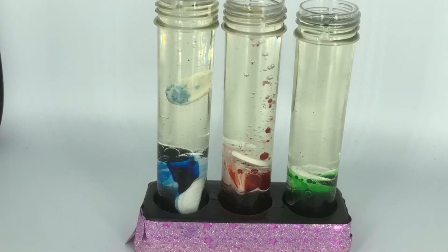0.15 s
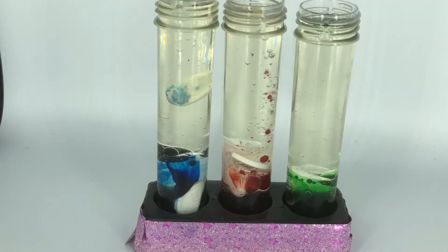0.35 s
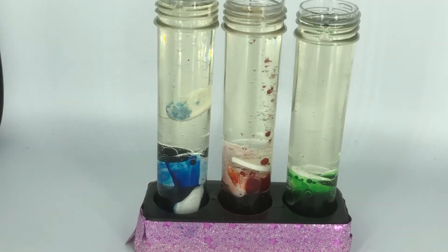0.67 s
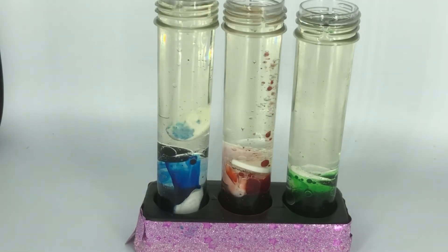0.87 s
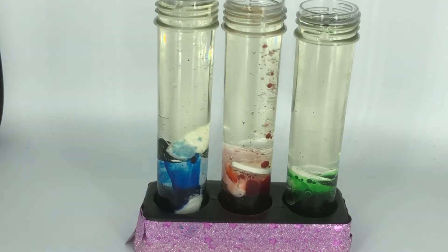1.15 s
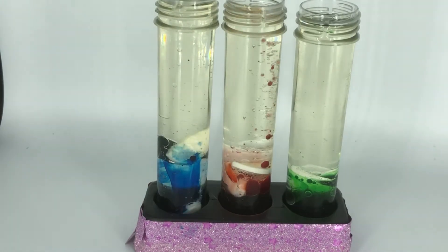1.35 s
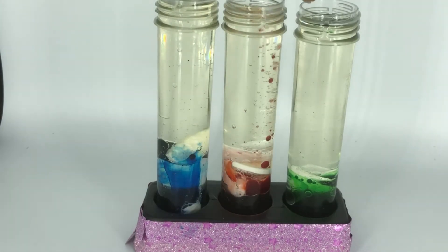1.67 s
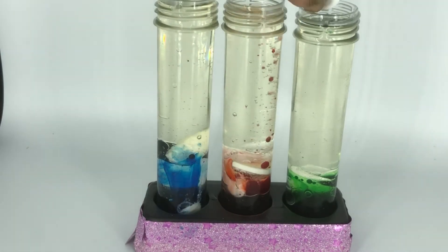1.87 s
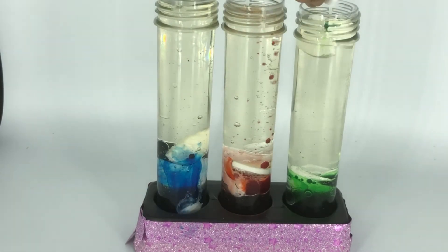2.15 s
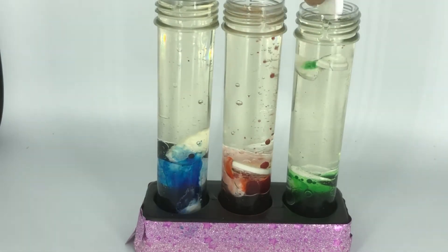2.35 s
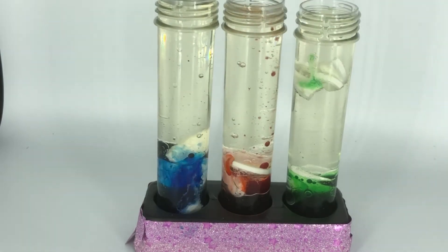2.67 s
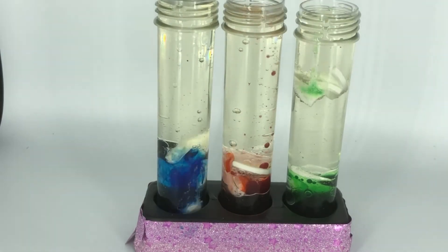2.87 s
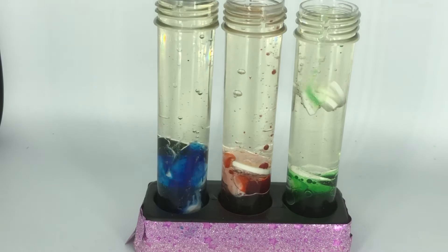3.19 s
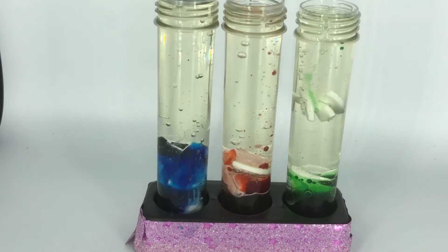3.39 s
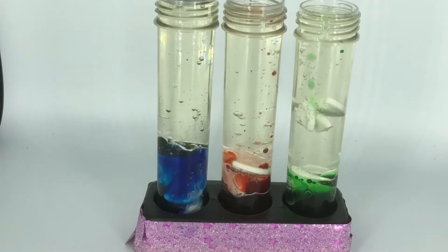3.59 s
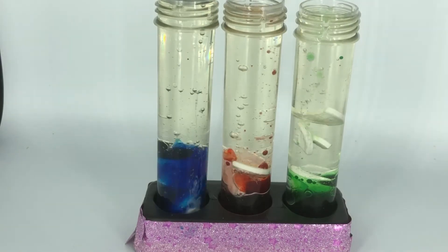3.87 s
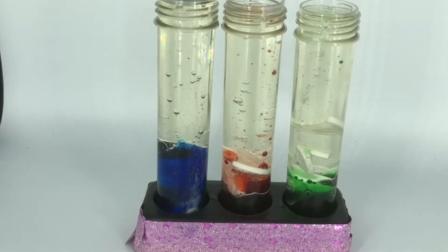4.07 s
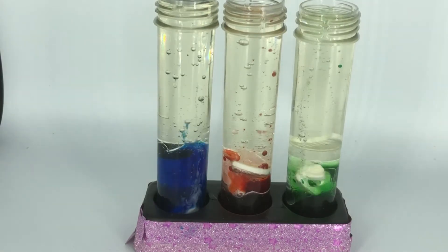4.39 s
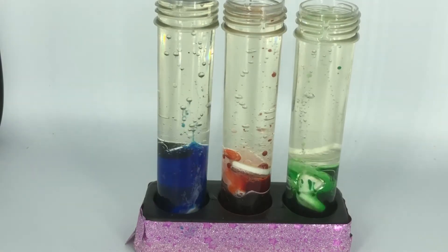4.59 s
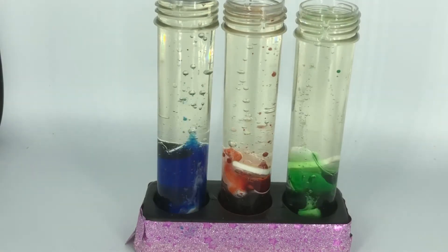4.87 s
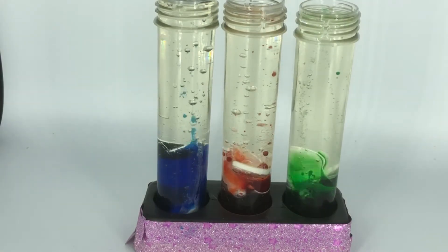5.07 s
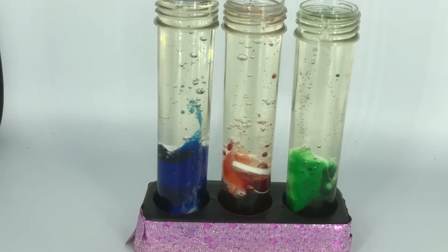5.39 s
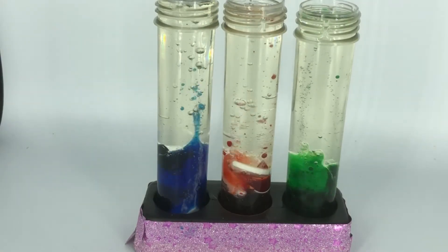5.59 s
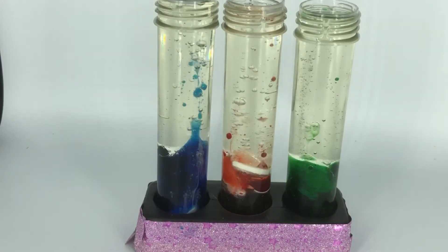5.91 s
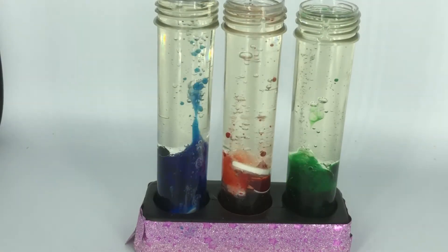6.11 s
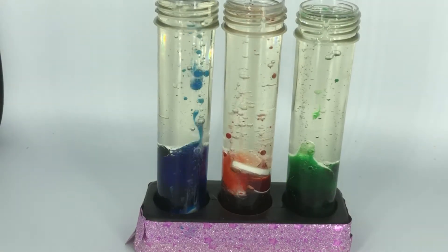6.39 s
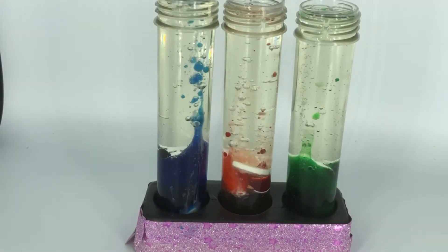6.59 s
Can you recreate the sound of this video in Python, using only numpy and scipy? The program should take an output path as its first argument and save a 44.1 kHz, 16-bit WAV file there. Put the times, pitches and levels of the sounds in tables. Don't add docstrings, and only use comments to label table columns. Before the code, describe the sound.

Quiet indoor hum with faint tablet fizz, sharp wrapper crackles, a few hard clicks on a tube, then thudding footsteps and scuffs further off.

```python
import sys
import numpy as np
from scipy import signal
from scipy.io import wavfile

SR = 44100
rng = np.random.default_rng(int(sys.argv[2]) if len(sys.argv) > 2 else 0)


def generate_wav(sig):
    pcm = np.round(np.clip(np.atleast_2d(sig).T, -1, 1) * 32767).astype(np.int16)
    wavfile.write(sys.argv[1], SR, pcm)


def linear_from_db(decibels):
    return 10 ** (np.asarray(decibels, float) / 20)


N = 297616
T = np.arange(N) / SR
EDGES_HZ = 25 * 2 ** np.arange(0, 9.5, 1 / 3)
MIDS_HZ = np.sqrt(EDGES_HZ[1:] * EDGES_HZ[:-1])

# f/Hz, level/dB, t60/s
BOARDS = [(144.8, -2.5, 0.19), (172, -8.5, 0.33), (204, 1, 0.11), (233, 0.5, 0.11), (267, -15, 0.19),
          (330, -6.5, 0.13), (395, -9.5, 0.1), (451.6, -0.5, 0.17), (483, 0, 0.51), (678, -7.5, 0.33),
          (696, -11, 0.41), (786, -29, 0.14), (971, -5.5, 0.14), (1112, -12, 0.56), (1194, -14, 0.28),
          (1400, -22, .14)]
# t/s, peak level/dB, hardness/dB, board note f/Hz
STEPS = [(3.2, -27.5, -19.5, 176), (3.24, -41, -14, 177), (3.646, -31, -12.5, 186),
         (3.943, -27.5, -24, 248), (3.988, -35, -16, 225), (4.061, -21, -15, 158), (4.135, -20, -15, 158),
         (4.165, -31, -12, 251), (4.197, -28.5, -18, 144), (4.26, -35, -22, 170), (4.63, -36.5, -15, 194),
         (4.66, -36.5, -9, 256), (4.72, -34, -16, 218), (4.789, -35, -22, 140), (5.391, -13.5, -1.5, 186),
         (5.427, -15, -12.5, 202), (5.598, -39, -6.5, 175), (5.858, -38, -23, 275),
         (6.078, -34.5, -18, 167), (6.127, -23, -22, 170), (6.175, -31.5, -31, 135), (6.252, -14, -5, 195),
         (6.285, -19.5, -9, 205), (6.319, -42, 11, 167), (6.474, -38, -16, 188), (6.519, -42, -7, 172),
         (6.648, -40.5, -4, 234)]


def rms_one(x):
    return x / np.sqrt(np.mean(x ** 2) + 1e-20)


def in_time(rows):
    s, *columns = np.transpose(rows)
    return [np.interp(T, s, c) for c in columns]


def level_of(spans):
    return sum((T > rows[0][0]) * (T < rows[-1][0]) * linear_from_db(in_time(rows)[0]) for rows in spans)


def band(x, low_hz, high_hz, order=2):
    edges = [low_hz, min(high_hz, 0.49 * SR)]
    return signal.sosfilt(signal.butter(order, edges, "band", fs=SR, output="sos"), x)


def drift(rate):
    r = np.exp(-80 * np.pi * rate / SR)
    noise = rng.standard_normal(N // 40 + 2002)
    slow = signal.lfilter([1], [1, -2 * r, r * r], noise)[2000:]
    return np.interp(np.arange(N) / 40, np.arange(len(slow)), rms_one(slow))


def ring(x, hz, t60):
    r = linear_from_db(-60 / (t60 * SR))
    w = 2 * np.pi * hz / SR
    return signal.lfilter([0, np.sin(w)], [1, -2 * r * np.cos(w), r * r], x + 1e-18)


def bands(excite, spectrum):
    hz, db = np.transpose(spectrum)
    gains = linear_from_db(np.interp(np.log(MIDS_HZ), np.log(hz), db, left=-np.inf))
    out = np.zeros((len(gains), N))
    for k, g in enumerate(gains):
        if g:
            out[k] = g * band(excite[k % 2], *EDGES_HZ[k:k + 2])
    return out / np.std(out.sum(0))


def grains(per_s, spread_db):
    sizes = linear_from_db(spread_db * np.minimum(rng.exponential(1, (2, N)), 5))
    sizes = sizes * rng.choice([-1, 1], (2, N))
    return sizes * (rng.random((2, N)) < per_s / SR)


def burst(rise, t60, size):
    t = np.arange(size) / SR
    shape = (1 - np.exp(-t / max(rise, 1e-4))) * linear_from_db(-60 * t / t60)
    return shape / shape.max()


def add(out, s, sound):
    at = round(s * SR)
    out[at:at + len(sound)] += sound[:N - at]


def after_steps(db, rise, t60):
    out = np.zeros(N)
    for s, peak_db, *_ in STEPS:
        add(out, s, (linear_from_db(peak_db + db) * burst(rise, t60, size=SR)) ** 2)
    return out


def room_tone():
    # f/Hz, level/dB per Hz
    hiss_colour = [(15, -58), (25, -57), (68, 0.5), (114, -14), (170, -1.5), (301, -7), (363, -13),
                   (439, -9.5), (641, -12), (962, -15.5), (2280, -23), (7710, -28), (8830, -26),
                   (16000, -37)]
    # f/Hz, width/Hz, level/dB
    port = (8700, 350, -17)
    # t/s, boom level/dB
    stir = [(0.0, -53), (0.25, -58.5), (0.9, -56.5), (1.2, -52), (1.9, -53), (2.15, -57), (2.5, -53),
            (3.0, -55), (3.5, -58.5), (3.9, -53.5), (4.45, -49), (4.62, -48), (4.8, -50), (4.9, -57),
            (5.3, -58.5), (5.8, -57.5), (6.5, -55), (6.75, -50.5)]
    # t/s, level/dB, rise/s, t60/s
    sway = (5.5, -53.5, -1.6, 4)

    hiss = bands(rng.standard_normal((2, N)), hiss_colour)
    hiss = sum(b * linear_from_db(1.8 * drift(12)) for b in hiss)
    hz, width, db = port
    hiss += linear_from_db(db) * rms_one(band(rng.standard_normal(N), hz - width / 2, hz + width / 2))

    stir_db, = in_time(stir)
    shake = rng.standard_normal(N) * linear_from_db(3.1 * drift(26))
    boom = sum(linear_from_db(g) * rms_one(ring(shake, hz, life * 0.15)) for hz, g, life in BOARDS if hz < 400)
    boom_power = linear_from_db(2 * stir_db) + after_steps(-20.5, rise=0.015, t60=0.45)
    boom = rms_one(band(boom, 116.4, 436, order=4)) * np.sqrt(boom_power)

    sub_db = -59.5 + 0.3 * (stir_db - stir_db.mean()) + 5 * drift(5.0)
    sub_power = after_steps(-34, rise=0.05, t60=0.34) + linear_from_db(2 * sub_db)
    rumble = rng.standard_normal(N)
    sub = rms_one(band(rumble, 43.5, 103)) * np.sqrt(sub_power) * linear_from_db(-5.5)
    s, db, rise, t60 = sway
    add(sub, s, rms_one(band(rumble, 24, 70)[SR:2 * SR]) * linear_from_db(db) * burst(rise, t60, size=SR))
    return linear_from_db(-56) * hiss + boom + sub


def fizz():
    # t/s, level/dB
    spans = [
        [(0.0, -63.5), (0.616, -70.5), (0.92, -62)],
        [(1.95, -64), (2.15, -62.5), (2.46, -70), (2.66, -58), (3.31, -60.5), (3.61, -59), (3.75, -56.5),
         (4.19, -60.5), (4.37, -58), (5.09, -55), (5.93, -56), (6.23, -50.5), (6.75, -52.5)],
    ]
    # f/Hz, width/Hz, level/dB
    mouth_modes = [(6200, 400, -16), (10600, 570, -16.5), (13200, 600, -16)]
    # t/s, peak level/dB, f/Hz
    pops = [(0.364, -42.5, 11000), (1.495, -36, 13500), (2.5965, -38, 9000), (3.1915, -45, 10400),
            (3.3113, -46, 8600), (3.76, -42, 11200), (3.887, -41, 7390), (4.4158, -52, 7300),
            (4.56, -35, 6110), (4.6762, -42, 9890), (5.2289, -46, 13100), (5.4006, -28, 7280),
            (5.5472, -55, 7180), (5.7099, -39, 12900), (5.8665, -38, 13100), (5.9982, -35.5, 8170),
            (6.0511, -41.5, 13100), (6.087, -51, 13200)]

    ticks = grains(5000, spread_db=3.0) * linear_from_db(0.7 * drift(20))
    mouths = sum(linear_from_db(db) * rms_one(band(ticks[1], hz - width / 2, hz + width / 2, order=1))
                 for hz, width, db in mouth_modes)
    surface = rms_one(band(ticks[0], 3500, 25700, order=1))
    out = linear_from_db(-1.5) * level_of(spans) * (surface + mouths)
    for s, db, hz in pops:
        spray = rng.standard_normal(900) * burst(0.0002, 0.09, size=900)
        add(out, s, linear_from_db(db - 6.5) * band(spray, hz * 0.87, hz * 1.07, order=1))
    return out


def creases():
    # t/s, peak level/dB, centre f/Hz, share under 4 kHz level/dB
    snaps = [(0.0984, -56, 11200, 7), (0.9468, -40.5, 12800, -6.5), (1.1004, -27.5, 11900, -38),
             (1.202, -30.5, 7100, -6), (1.2167, -31, 13500, -6), (1.2533, -32.5, 12100, -6),
             (1.285, -23, 10600, -17), (1.31, -31, 6450, -6), (1.3236, -30, 6680, -28),
             (1.394, -38, 13300, -17), (1.4066, -19, 6900, -20), (1.4207, -24, 13700, -14),
             (1.448, -34, 13600, -4.5), (1.5171, -28.5, 6390, -25), (1.525, -27.5, 7350, -7),
             (1.553, -32, 7390, -4.5), (1.5851, -37.5, 9930, 0.5), (1.611, -46.5, 5800, 6.5),
             (1.6277, -17.5, 9900, -15.5), (2.4537, -48.5, 10300, 5), (2.4742, -50, 10300, 2),
             (2.507, -31, 10200, -33), (2.5432, -25, 11800, -8.5), (2.6602, -34.5, 9000, -10),
             (2.7043, -33, 6090, -29), (2.766, -43, 5390, 1.5), (2.819, -46.5, 5000, 6.5),
             (2.848, -40, 7540, -4), (2.92, -33, 12500, -37), (3.031, -36, 12400, -27)]
    out, size = np.zeros(N), 6000
    lag = round(0.0033 * SR)
    for s, db, hz, low_db in snaps:
        t60 = 0.089 * linear_from_db(-0.23 * (db + 37))
        unevenness = np.repeat(rng.standard_normal(size // 40), 40)
        crackle = rng.standard_normal(size) * linear_from_db(2.7 * unevenness)
        shiver = crackle * burst(0.00052, t60, size) * linear_from_db(-7)
        shiver[0] += 1.5
        shiver[lag:] += linear_from_db(-13) * shiver[:-lag]
        bright = band(shiver, 4450, 15900) + 0.36 * band(shiver, hz * 0.85, hz * 1.18)
        bright *= linear_from_db(db) / np.abs(bright).max()
        dull = band(shiver, 630, 6300, order=1)
        add(out, s, bright + dull * linear_from_db(db + low_db + 4) / np.abs(dull).max())
    return out


def rub():
    # t/s, level/dB
    spans = [
        [(0.92, -62), (1.0, -51.5), (1.132, -45), (1.248, -48.5), (1.544, -53), (1.754, -50.5), (1.884, -50.5),
         (1.95, -60)],
        [(2.0, -65), (2.374, -63), (2.55, -56), (2.704, -57), (3.15, -62)],
    ]
    # f/Hz, level/dB per Hz
    foil_colour = [(180, -22), (300, -8), (478, 0), (603, -7), (689, -10), (930, 0), (1930, -9.5),
                   (4670, -7), (13500, -13), (16000, -16)]
    # f/Hz, width/Hz, level/dB
    pouch = [(888, 46, -10.5), (1280, 65, -26), (4620, 240, -22)]

    slips = grains(9000, spread_db=2.0)
    hollow = sum(linear_from_db(db) * rms_one(ring(slips[0], hz, 4.2 / width)) for hz, width, db in pouch)
    foil = bands(slips, foil_colour).sum(0)
    return level_of(spans) * linear_from_db(1.1 * drift(18) - 1) * (foil + hollow)


def taps():
    # t/s, peak level/dB, own note f/Hz, own note level/dB, tilt/dB per octave
    strikes = [
        (2.0846, -31, 6000, -1, 4.5),
        (2.3197, -19.5, 2850, -3, 7),
        (2.427, -37.5, 650, 4, -6),
        (3.982, -41.5, 2700, 10, 11.5),
        (4.773, -43, 600, 15, -11),
    ]
    # f/Hz, level/dB, t60/s
    tube = [(527, 8, 0.035), (674, 6, 0.026), (897, 1, 0.082), (1260, 3.5, 0.016), (1430, 6.5, 0.034),
            (1690, -5, 0.036), (2360, -29, 0.014), (2850, -3, 0.0088), (5360, -23, .012), (6270, -27, .012),
            (9200, -19, .01)]

    out, size = np.zeros(N), 12000
    lag = round(0.015 * SR)
    click = np.zeros(size)
    click[:5] = np.hanning(7)[1:-1]
    for s, db, note_hz, note_db, tilt_db in strikes:
        body = np.zeros(size)
        for k, (hz, g, t60) in enumerate(tube):
            body += (-1) ** k * linear_from_db(g + tilt_db * np.log2(hz / 1400)) * ring(click, hz, t60)
        chatter = rms_one(band(rng.standard_normal(size), note_hz * 0.66, note_hz * 1.03))
        chatter *= burst(0.00014, 0.035, size)
        body = body / np.abs(body).max() + linear_from_db(note_db - 13.5) * chatter
        body[lag:] += linear_from_db(-8.5) * band(body[:-lag], 390, 1230)
        wash = rms_one(band(rng.standard_normal(size), 360, 850, order=1)) * burst(0.0021, 0.15, size)
        add(out, s, linear_from_db(db) * (body + linear_from_db(-19.5) * wash))
    return out


def even(push, paths, hz, t60):
    return ring(push, hz, t60) / np.abs(ring(paths, hz, 0.086)).max()


def steps():
    out, size, roll_s = np.zeros(N), 14000, 0.13
    arrivals = grains(900, spread_db=2.0)[0, :size] * burst(0.0033, roll_s, size)
    arrivals[90] += 3
    for s, db, mid_db, note_hz in STEPS:
        t60 = 0.24 * linear_from_db(-0.19 * (mid_db + 9))
        top_db = -42 + 0.3 * (mid_db + 13)
        white = rng.standard_normal((4, size))
        push = arrivals + linear_from_db(-16.5) * white[0] * burst(0.0051, roll_s, size)
        low, mid = np.zeros(size), np.zeros(size)
        for hz, g, life in BOARDS:
            if hz < 400:
                off_note_db = 9 * abs(np.log2(hz / note_hz))
                low += linear_from_db(g - off_note_db) * even(push, arrivals, hz, life * t60 * 4)
            else:
                mid += linear_from_db(g) * even(push, arrivals, hz, life * t60 * 3)
        modes = low / np.abs(low).max() + linear_from_db(mid_db) * mid / np.abs(mid).max()
        wash = rms_one(band(white[1], 350, 656, order=1)) * burst(0.0064, t60 * 1.34, size) * linear_from_db(mid_db - 11)
        top = rms_one(band(white[2], 1300, 5400)) * burst(0.0046, t60 * 1.3, size)
        air = rms_one(band(white[3], 5000, 10000)) * burst(0.003, t60 * 0.98, size) * linear_from_db(-14)
        add(out, s, linear_from_db(db) * (modes + wash + (top + air) * linear_from_db(top_db - 24)))
    return signal.sosfilt(signal.butter(6, 118, "high", fs=SR, output="sos"), out)


def swish(strokes, fold_hz, fold_db, fold_per_tilt, width):
    # f/Hz, level/dB per Hz
    fibre_colour = [(240, -37), (400, -9.5), (598, -13.5), (964, -8.5), (1490, -13), (3530, -12),
                    (4380, -12), (11900, -23.5), (16000, -39)]
    fibres = bands(grains(14000, spread_db=3.5), fibre_colour)[10:]
    mids = MIDS_HZ[10:]
    octaves, out = np.log2(mids / 3500), np.zeros(N)
    fold = np.exp(-(np.log2(mids / fold_hz) / width) ** 2)
    t = np.arange(SR // 2) / SR
    for k, (s, attack, hold, db, tilt_db) in enumerate(strokes):
        late = np.maximum(t - attack - hold, 0)
        shape = linear_from_db(-13.5 * np.maximum(1 - t / attack, 0))
        shape *= np.minimum(50 * (t[-1] - t), 1)
        shape *= linear_from_db(-209 * late) + linear_from_db(-15.5 - 70 * late)
        colour = linear_from_db(db + (tilt_db + 1.5) * octaves + fold * (fold_db - fold_per_tilt * (tilt_db + 1)))
        own_fibres = fibres[:, k * 12000:k * 12000 + len(t)]
        add(out, s, shape * (colour @ own_fibres))
    return out


def scuffs():
    # start t/s, attack/s, hold/s, level/dB, tilt/dB per octave
    strokes = [(3.197, 0.006, 0.0083, -56.5, -5.5), (3.643, 0.0064, 0.018, -59, -6),
               (3.805, 0.0099, 0.09, -62, -4.5), (4.056, .006, 0.03, -61, -8),
               (4.13, 0.083, .08, -48.5, -0.5), (4.76, .015, .01, -60.5, -3.5),
               (4.88, 0.011, 0.012, -59, -3.5), (5.389, 0.0043, 0.006, -31.5, -4),
               (5.56, .03, .03, -59, -3.5), (5.85, 0.04, 0.027, -50, -3), (6.03, 0.014, 0.0086, -60.5, -4),
               (6.1, 0.037, 0.065, -49, -2.5), (6.175, 0.027, 0.048, -48, -5),
               (6.2, 0.033, 0.012, -44.5, 2), (6.252, 0.015, 0.019, -38, -3.5),
               (6.61, 0.047, 0.076, -49, -2)]
    return swish(strokes, fold_hz=1055, fold_db=2, fold_per_tilt=1.2, width=0.38)


def brushes():
    # start t/s, attack/s, hold/s, level/dB, tilt/dB per octave
    strokes = [
        (3.81, 0.023, 0.021, -58, -5.5),
        (3.87, 0.038, .01, -50, -1.5),
        (4.3, 0.027, 0.0088, -50, -3),
        (4.375, 0.015, 0.013, -51, -2),
        (4.547, .012, .015, -42, -1),
        (5.275, 0.013, .03, -56, -3),
    ]
    return swish(strokes, fold_hz=1870, fold_db=0.5, fold_per_tilt=2.9, width=0.56)


def scene():
    background = room_tone()
    near = fizz() + creases() + rub() + taps()
    far = steps() + scuffs() + brushes()
    return (near + far + background)[None]


def low_pass(x):
    return signal.sosfilt(signal.butter(12, 16710, fs=SR, output="sos"), x)


def record(dry):
    cut = signal.sosfilt(signal.ellip(12, 0.5, 75, 15850, fs=SR, output="sos"), dry)
    return low_pass(cut)


dry = scene()
out = record(dry)
generate_wav(out)
```